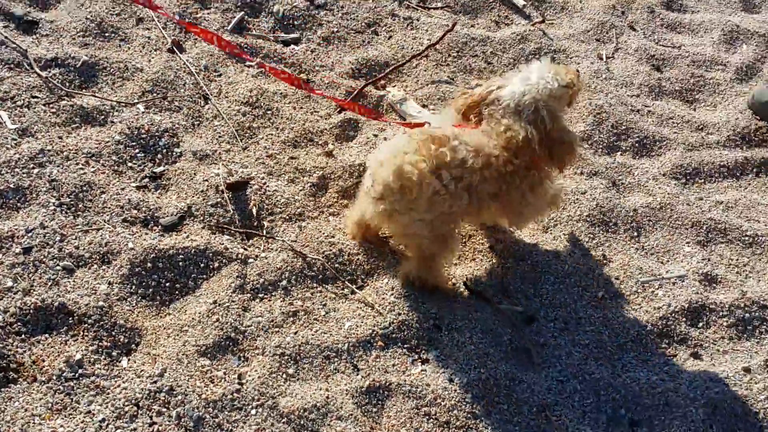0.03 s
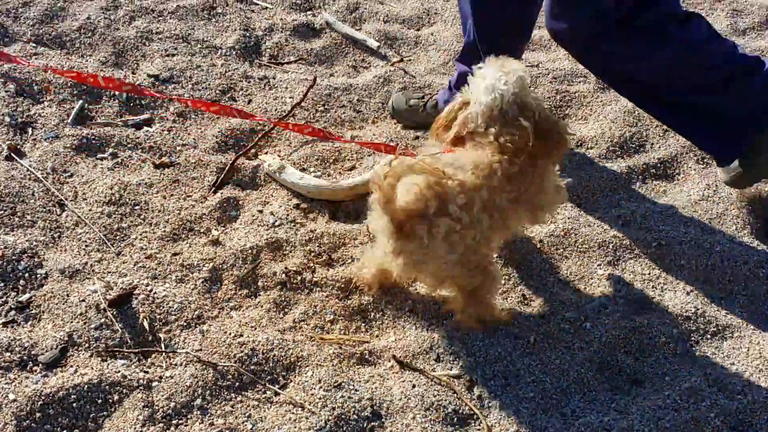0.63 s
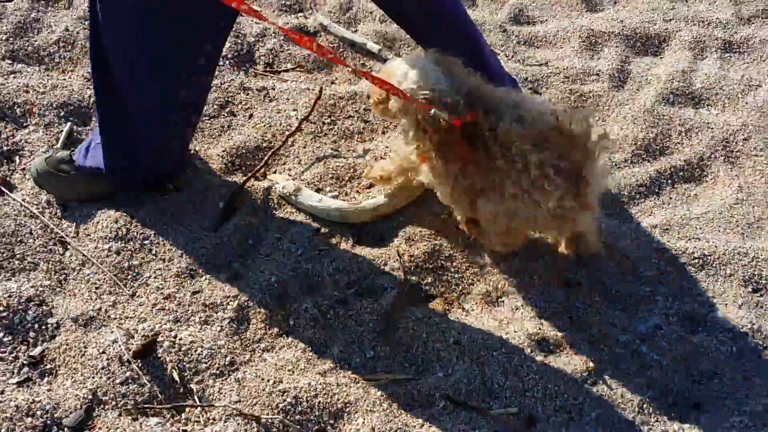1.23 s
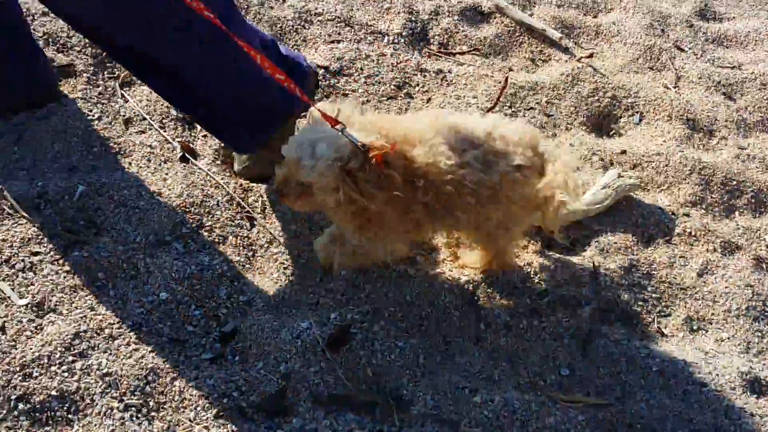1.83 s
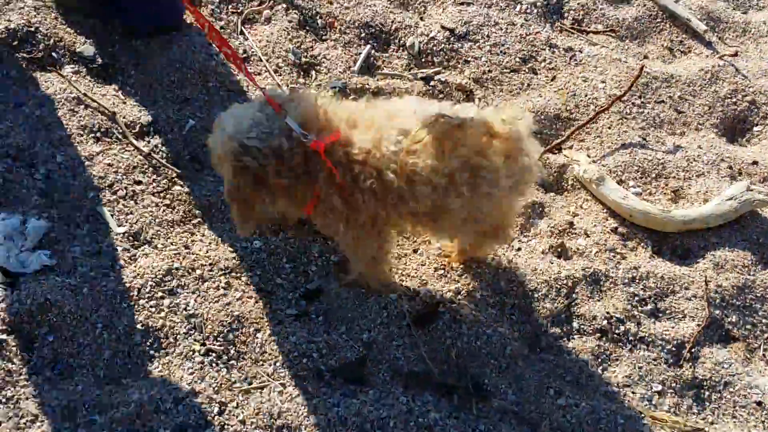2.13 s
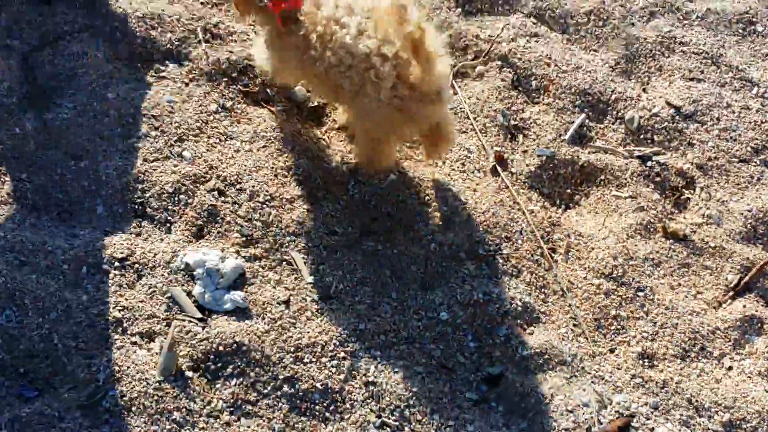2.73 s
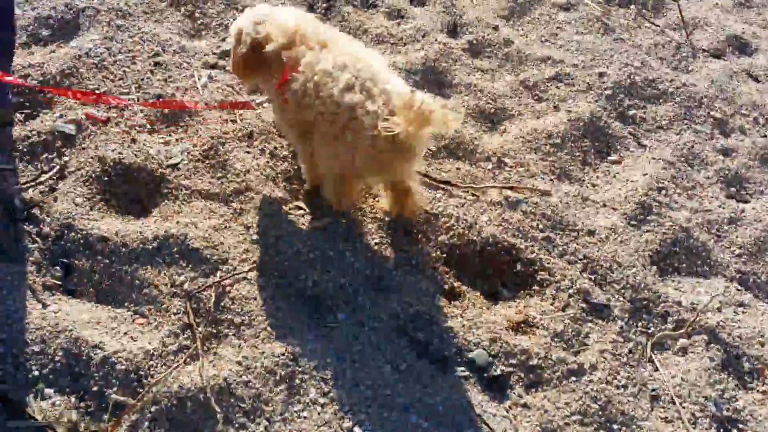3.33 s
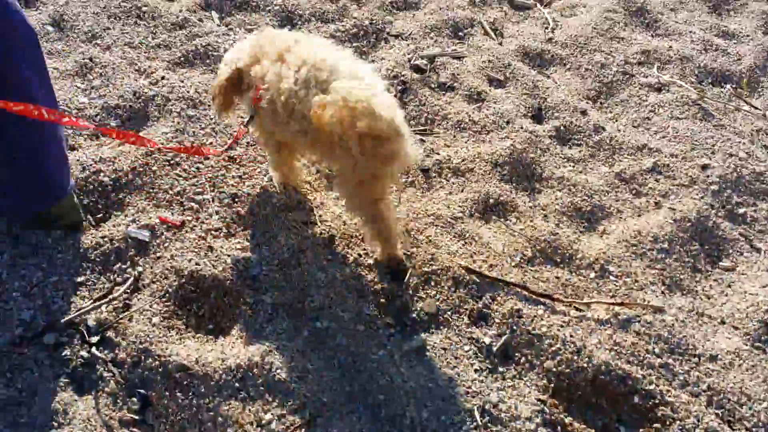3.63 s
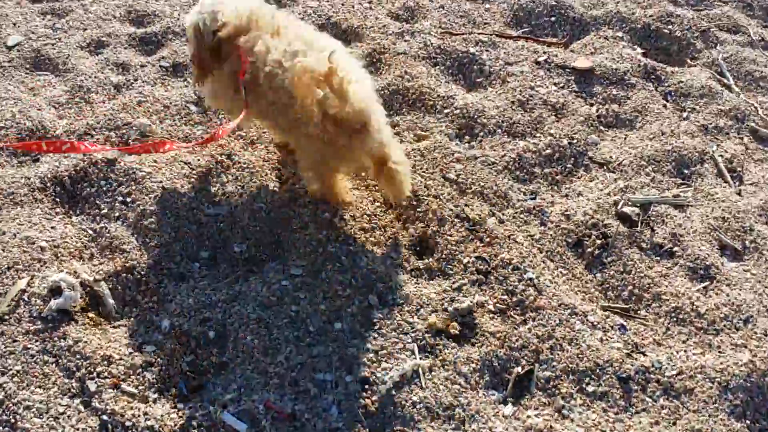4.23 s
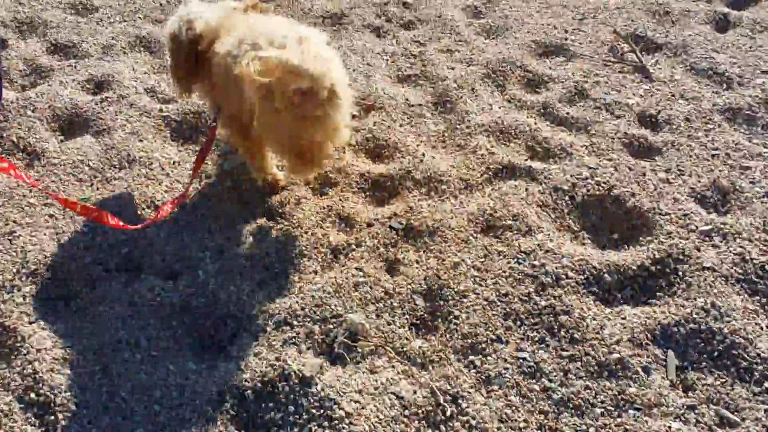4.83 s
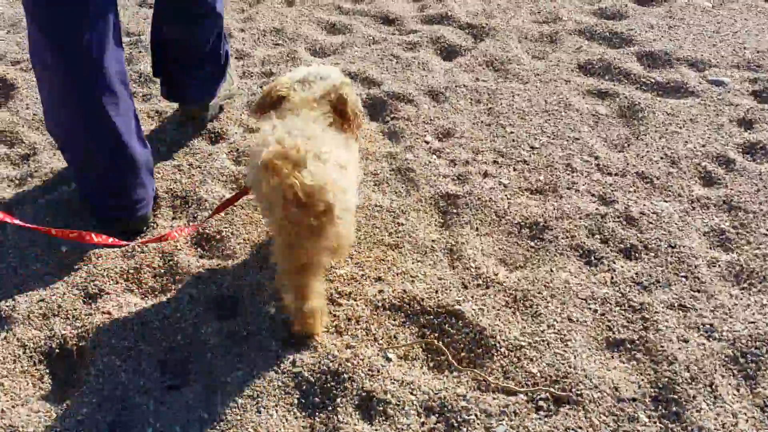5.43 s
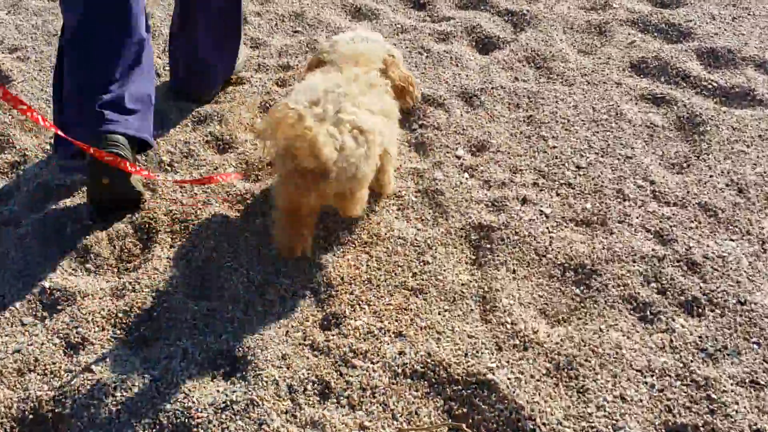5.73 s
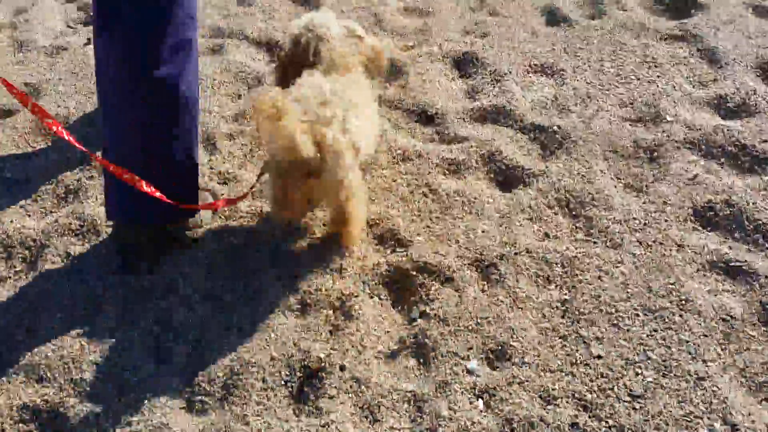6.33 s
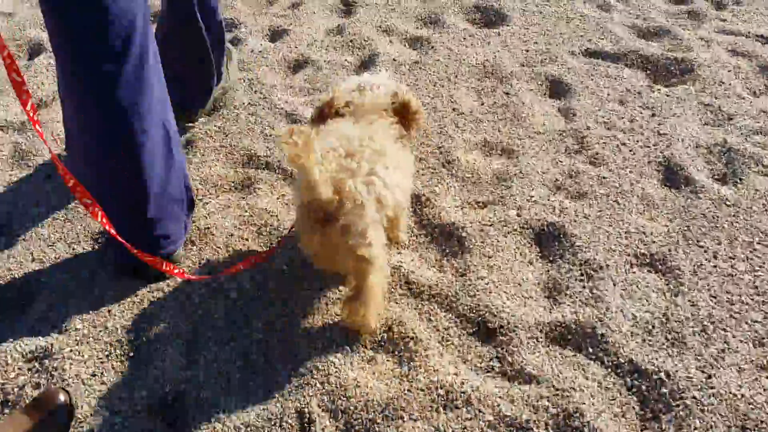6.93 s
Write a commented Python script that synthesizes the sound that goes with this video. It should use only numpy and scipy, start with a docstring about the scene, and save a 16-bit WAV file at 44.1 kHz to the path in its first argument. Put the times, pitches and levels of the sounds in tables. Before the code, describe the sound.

Wind rumbles and buffets the microphone as a person and a small dog walk over gritty beach sand.

```python
"""On a beach of coarse sand, a walker leads a small dog just ahead of a hand-held camera.
Shoes and paws set off countless grain collisions, heard as a low crunch and a bright spray. Soles rasp
by friction, a twig fractures, and the metal clasp of the leash rings in short-lived modes.
Turbulent wind buffets mainly the left microphone port; faint surf lies behind."""
import sys
import numpy as np
from scipy import signal
from scipy.fft import rfft, irfft, next_fast_len
from scipy.io import wavfile
from scipy.ndimage import uniform_filter1d, map_coordinates

SR = 44100
rng = np.random.default_rng(int(sys.argv[2]) if len(sys.argv) > 2 else 0)


def generate_wav(signal):
    """Clip the signal to [-1, 1] and save it as 16-bit WAV at the path in sys.argv[1]."""
    frames = np.transpose(np.atleast_2d(signal))
    scaled = np.clip(frames, -1, 1) * 32767
    pcm = np.round(scaled).astype(np.int16)
    wavfile.write(sys.argv[1], SR, pcm)


N = 317520

# Event levels are relative: each source adds its own gain.
# resonances and notches of the two port ducts: frequency_hz, left_db, right_db
PORT_RESPONSE = [(400, -6, -3.5), (1110, -9, -3.5), (1645, -7, -0.5), (2210, -6.5, -9.5),
                 (2970, -17.5, -17), (3660, -11.5, -7), (5170, -12.5, -5.5), (5860, -14, -10),
                 (6920, -1.5, -10.5), (8030, -7.5, -2), (8500, -8, 3), (9520, -11.5, -9.5),
                 (10600, -11, -9), (15500, -13, -11.5)]
# spectra of water and moving air: frequency_hz, gain_db
SURF_SPECTRUM = [(20, 3), (90, -3.5), (250, 0.5), (600, -3), (1500, -10.5), (3000, -13.5), (14000, -20.5)]
BREEZE_SPECTRUM = [(15, -20), (35, -9), (70, 5), (130, 6), (220, -6), (350, -15.5), (600, -45), (1500, -57),
                   (4000, -90)]
EDDY_SPECTRUM = [(15, -29), (40, -21), (70, 0), (135, 3), (250, -4), (370, -17), (600, -36), (1500, -67),
                 (4000, -92)]
FLUTTER_SPECTRUM = [(150, -26), (350, 4.5), (480, -4.5), (700, -12.5), (1100, -28.5), (2000, -66),
                    (5000, -72)]
POP_SPECTRUM = [(100, -19), (330, 3.5), (480, -1), (750, 7.5), (1150, 8.5), (1700, -6), (4000, -35)]
# strength of the wind at the camera: time_s, level_db
BREEZE_LEVELS = [(0.0, -34), (0.36, -35), (0.68, -38), (0.94, -50), (1.14, -27.5), (1.46, -41),
                 (1.86, -45.5), (2.15, -51), (2.3, -35.5), (2.63, -38), (2.87, -38.5), (3.11, -50),
                 (3.23, -28), (3.31, -27), (3.57, -32), (4.43, -32), (4.61, -28), (4.87, -35.5),
                 (5.21, -41.5), (5.37, -46.5), (6.44, -42), (6.66, -31), (6.94, -31.5), (7.2, -35)]
# eddies that buffet a port: start_s, length_s, level_db, flutter_offset_db, port
EDDIES = [(0.0, 0.097, -21.5, -36, "left"), (0.104, 0.053, -14.5, -16.5, "left"),
          (0.113, 0.12, -37, -24, "right"), (0.178, 0.038, -12.5, -21, "left"),
          (0.315, 0.09, -17, -18.5, "left"), (0.442, 0.14, -27.5, -24, "left"),
          (0.915, .039, -19.5, -19, "left"), (0.967, 0.085, -27, -53, "left"),
          (1.183, .048, -15.5, -22, "left"), (1.256, 0.046, -25.5, -22, "left"),
          (1.361, 0.031, -25, -32, "left"), (1.777, 0.028, -25.5, -19, "left"),
          (1.907, 0.052, -22, -19, "left"), (2.082, 0.074, -15, -15, "left"),
          (2.167, 0.082, -22, -35, "left"), (2.304, 0.14, -19, -14, "left"),
          (2.455, 0.045, -10.5, -14, "left"), (2.556, 0.11, -29.5, -39, "left"),
          (3.048, 0.077, -22.5, -19, "left"), (3.137, 0.038, -13.5, -28, "left"),
          (3.187, 0.056, -16.5, -19, "left"), (3.262, 0.13, -12.5, -20, "left"),
          (3.47, 0.05, -15, -14, "left"), (3.586, 0.069, -22, -17, "left"),
          (3.771, 0.08, -30, -30, "right"), (3.832, 0.091, -18, -23, "left"),
          (4.013, 0.023, -19, -34, "left"), (4.072, 0.059, -13.5, -21, "left"),
          (4.132, 0.025, -28, -14, "right"), (4.142, .043, -23, -20, "left"),
          (4.28, 0.051, -19, -25, "left"), (4.376, 0.022, -19, -31, "left"),
          (4.461, 0.039, -13.5, -12.5, "left"), (4.595, 0.041, -11, -16, "left"),
          (4.643, 0.045, -13.5, -16.5, "left"), (4.7, 0.059, -15.5, -29, "left"),
          (4.785, 0.041, -20.5, -34, "left"), (5.147, 0.077, -18.5, -22, "left"),
          (5.23, 0.05, -12.5, -16.5, "left"), (5.591, 0.041, -21.5, -12, "left"),
          (5.687, 0.053, -22, -26, "left"), (5.751, 0.12, -27, -39, "left"),
          (5.78, 0.042, -34, -25, "right"), (6.099, 0.039, -20, -18, "left"),
          (6.436, 0.065, -16.5, -15.5, "left"), (6.594, 0.049, -12.5, -21, "left"),
          (6.695, 0.063, -29.5, -25, "right"), (6.759, 0.087, -10.5, -10, "left"),
          (6.856, 0.079, -17, -11.5, "left"), (6.953, 0.023, -23.5, -25, "right"),
          (7.078, 0.037, -17.5, -12, "left"), (7.157, .024, -12.5, -14.5, "left")]
# the fiercest eddies bursting on the left port: start_s, level_db
POPS = [(0.119, -18), (2.084, -18), (2.102, -21), (2.465, -24), (3.164, -15.5), (3.215, -23), (3.266, -27),
        (3.495, -16), (4.477, -16), (4.485, -21.5), (4.618, -15), (5.244, -21.5), (6.624, -17.5),
        (6.794, -11.5), (6.827, -24), (7.168, -23)]
# modes of the leash clasp: pitch_hz, level_db
CLASP_MODES = [(4050, -7), (5050, -13), (6900, -1), (7650, 0), (10600, -3), (13300, -3)]
# clasp and ring touch: start_s, level_db
CLINKS = [(2.642, -23.5), (2.651, -32), (2.659, -25.5), (2.666, -32), (2.673, -25), (2.726, -26),
          (2.768, -32)]
# two quick cracks of the twig: start_s, level_db
SNAPS = [(3.9199, -12), (3.922, -19.5)]
# spectra of breaking wood and moving sand: frequency_hz, gain_db
TWIG_SPECTRUM = [(300, -20), (650, -13), (850, 6), (1150, -2), (1600, -6), (2900, 6.5), (4250, 3),
                 (5500, -1), (7200, 0), (9500, -14), (14000, -4)]
BRUSH_SPECTRUM = [(3000, -42), (6800, -3), (7800, -6), (8300, 4), (9000, -3), (10500, -5), (14500, -3)]
SCUFF_SPECTRUM = [(500, -11), (1150, -12), (1450, 3.5), (1550, -6), (1660, 4), (1950, -7), (3000, -11),
                  (5000, -14), (14000, -18)]
TRICKLE_SPECTRUM = [(3000, -21), (7000, -20), (10000, 1), (14500, -9)]
SPRAY_SPECTRUM = [(500, -15), (1800, -3), (3500, -1), (8000, 0.5), (14500, 0.5)]
CRUNCH_SPECTRUM = [(100, 3), (400, -0.5), (900, 3.5), (2200, 2.5), (3200, -0.5), (5000, -2), (10000, -50)]
# paws brush the fine top layer: start_s, length_s, level_db
PAW_BRUSHES = [(0.06, 0.11, -46.5), (0.68, 0.13, -47), (1.36, 0.071, -50), (2.0, 0.24, -46.5),
               (2.2, 0.081, -40), (2.7, 0.059, -46), (2.99, .11, -41), (3.21, 0.036, -47),
               (4.28, 0.083, -49), (6.34, 0.24, -45), (6.93, 0.052, -38)]
# soles grind the packed sand: start_s, length_s, level_db
SOLE_SCUFFS = [(1.87, 0.043, -39), (3.205, 0.027, -49), (4.922, 0.025, -38), (5.74, 0.043, -28.5),
               (5.757, 0.012, -29), (6.39, 0.056, -38.5), (6.95, 0.079, -40)]
# feet strike and throw grains: start_s, level_db, t60_s
KICKS = [(0.051, -39.5, 0.11), (1.141, -38, .12), (1.335, -39.5, 0.087), (1.709, -36.5, 0.41),
         (2.881, -34.5, 0.051), (2.963, -30.5, 0.031), (3.596, -32, 0.092), (4.186, -33, 0.073),
         (4.906, -33, 0.13), (5.175, -26, 0.051), (5.393, -37, .012), (6.007, -34, 0.026),
         (6.156, -34, .12), (6.976, -23.5, 0.045), (6.983, -21.5, 0.037)]
# shoes and paws sink in: start_s, rise_s, hold_s, spray_db, crunch_db, spray_left_minus_right_db
STEPS = [(0.0, 0.088, 0.098, -52, -51, 4), (0.308, 0.19, .07, -45, -43, -6),
         (0.564, .1, .19, -42.5, -45.5, -2.5), (1.03, .07, .02, -50, -57, -1),
         (1.125, 0.049, 0.021, -35, -37, 0), (1.324, 0.058, .1, -43.5, -45, 0),
         (1.5, 0.14, .03, -48, -50, -1), (1.683, 0.051, 0.052, -33.5, -39, 0),
         (1.841, 0.04, 0.041, -37.5, -41.5, 0), (1.96, 0.016, 0.079, -40.5, -59, -2),
         (2.153, 0.093, 0.062, -40, -47, -4), (2.307, 0.047, 0.064, -37, -43, -1),
         (2.515, .05, 0.27, -45.5, -49.5, -1), (2.864, 0.16, 0.07, -38.5, -44.5, -0.5),
         (3.174, 0.042, .015, -37.5, -40.5, -3), (3.28, 0.089, 0.039, -40.5, -48.5, -3),
         (3.46, 0.14, 0.12, -36.5, -44, -2), (3.771, 0.051, 0.023, -36.5, -41.5, -1.5),
         (3.863, 0.032, 0.15, -33.5, -43, -1.5), (4.172, 0.11, 0.08, -32, -38.5, 0),
         (4.376, 0.07, 0.014, -33.5, -42.5, -1.5), (4.519, 0.029, 0.035, -34, -38.5, -5),
         (4.63, 0.036, 0.024, -33, -41, -3), (4.74, .03, 0.17, -38, -43.5, 1),
         (4.878, 0.055, 0.022, -27.5, -35.5, 0), (4.968, 0.034, 0.058, -38, -42.5, -2),
         (5.056, 0.14, 0.085, -31.5, -36, -4), (5.473, 0.12, 0.022, -28.5, -35, 1),
         (5.638, 0.051, .02, -35.5, -43, -2), (5.722, 0.038, 0.14, -31.5, -40.5, -4),
         (5.972, 0.072, 0.15, -44, -46.5, -2), (6.104, 0.12, 0.058, -31.5, -36, -0.5),
         (6.268, .11, 0.038, -29.5, -34.5, -4.5), (6.474, .03, .025, -36, -37, -5),
         (6.554, .04, 0.22, -44, -42.5, 0), (6.799, 0.092, 0.098, -31, -34.5, 0.5),
         (6.98, 0.021, 0.052, -45, -38.5, -20)]


def amp(db):
    """Amplitude ratio of a level in decibels."""
    return 10 ** (np.asarray(db) / 20)


def unit(x):
    """Normalisation to rms 1."""
    return x / np.sqrt(np.mean(x ** 2) + 1e-20)


def wobble(knots_per_s):
    """Smooth random modulation: a spline through Gaussian knots."""
    knots = rng.standard_normal(int(N * knots_per_s / SR) + 4)
    return map_coordinates(knots, [np.arange(N) * knots_per_s / SR])


def gain(spectrum, hz):
    """Magnitude response, interpolated in log frequency for each level column."""
    points_hz, *columns = np.transpose(spectrum)
    return amp(np.squeeze([np.interp(np.log(hz + 1), np.log(points_hz), db) for db in columns]))


def filtered(x, response):
    """Linear filtering: multiplication in the frequency domain."""
    size = next_fast_len(N + 8192, real=True)
    hz = np.fft.rfftfreq(size, 1 / SR)
    return irfft(rfft(x, size) * response(hz), size)[..., :N]


def coloured(x, spectrum):
    """Zero-phase spectral shaping."""
    return filtered(x, lambda hz: gain(spectrum, hz))


def at_ports(pair, spectrum, correlation, lag_s=0):
    """Two independent signals mix and pass the duct resonances; the left leads by lag_s."""
    angle = np.arccos(correlation) / 2
    mixed = np.cos(angle) * pair[0] + np.sin(angle) * np.array([pair[1], -pair[1]])
    lead_s = np.array([[lag_s], [-lag_s]]) / 2

    def response(hz):
        return gain(spectrum, hz) * gain(PORT_RESPONSE, hz) * np.exp(2j * np.pi * hz * lead_s)
    return filtered(mixed, response)


def add_gated(track, source, start_s, length_s, db, edge_s):
    """Windowing: add a soft-edged burst with the energy of rms level db held for length_s."""
    end_s = start_s + length_s
    i = np.arange(max(int((start_s - edge_s) * SR), 0), min(int((end_s + edge_s) * SR), N))
    inside_s = np.minimum(i / SR - start_s, end_s - i / SR)
    gate = .5 + .5 * np.sin(np.pi / 2 * np.clip(inside_s / edge_s, -1, 1))
    burst = gate * source[i]
    track[i] += amp(db) * burst * np.sqrt(length_s * SR / (np.sum(burst ** 2) + 1e-12))


def impacts(rows):
    """Impulsive excitation: stereo noise starts at once and decays exponentially."""
    t = np.arange(SR // 4) / SR
    out = np.zeros((2, N + SR))
    for start_s, db, t60_s in rows:
        decay = amp(db - 60 * t / t60_s)
        out[:, round(start_s * SR):][:, :len(t)] += decay * rng.standard_normal((2, len(t)))
    return out[:, :N]


def surf(level_db=-44.5, heave_db=-0.3):
    """Distant waves sum incoherently to a dull wash that heaves slightly."""
    wash = unit(at_ports(rng.standard_normal((2, N)), SURF_SPECTRUM, correlation=0.62))
    return wash * amp(level_db + heave_db * wobble(0.85))


def turbulence(spectrum, span_s):
    """Random pressure of turbulent air, held near rms 1 over each span."""
    pressure = coloured(rng.standard_normal(N), spectrum)
    power = np.abs(uniform_filter1d(pressure ** 2, int(span_s * SR)))
    return pressure / np.sqrt(power + 1e-12)


def wind(exposed_db=4, sheltered_db=-39.5, sheltered_share=0.19):
    """Turbulent flow rumbles over both ports; eddies thump, and flow separation flutters higher up."""
    breeze_db = np.interp(np.arange(N) / SR, *np.transpose(BREEZE_LEVELS))
    right_db = sheltered_db + sheltered_share * (breeze_db - breeze_db.mean())
    left = turbulence(BREEZE_SPECTRUM, span_s=0.06) * amp(breeze_db + exposed_db + 2.7 * wobble(35))
    right = turbulence(BREEZE_SPECTRUM, span_s=0.24) * amp(right_db + 4.6 * wobble(25))
    thump = turbulence(EDDY_SPECTRUM, span_s=0.0292)
    flutter = turbulence(FLUTTER_SPECTRUM, span_s=0.014) * amp(4.3 * wobble(170))
    for start_s, length_s, db, flutter_db, port in EDDIES:
        track = left if port == "left" else right
        add_gated(track, thump, start_s, length_s, db - .3, edge_s=0.0077)
        add_gated(track, flutter, start_s, length_s, db + flutter_db, edge_s=0.0061)
    # the ports pass little of the deepest rumble
    return coloured(np.array([left, right]), [(20, -8), (45, 0.5), (90, -0.5)])


def eddy_pops(ring_hz=350, rise_s=0.0013, gain_db=9):
    """A collapsing eddy is a pressure transient: one or two sharp swings at the left port."""
    t = np.arange(SR // 40) / SR
    swell = t / rise_s * np.exp(1 - t / rise_s)
    left = np.zeros(N + SR)
    for (start_s, db), detune in zip(POPS, rng.standard_normal(len(POPS))):
        swing = np.sin(2 * np.pi * ring_hz * (1 + 0.079 * detune) * t)
        left[round(start_s * SR):][:len(t)] += amp(db + gain_db) * swell * swing
    return np.array([coloured(left[:N], POP_SPECTRUM), np.zeros(N)])


def leash(t60_s=0.022, pitch_spread=0.052, spread_db=2, rattle_db=-4, gain_db=-6.5):
    """Modal ringing: each touch excites the clasp a little differently, and loose parts rattle."""
    t = np.arange(SR // 10) / SR
    mode_hz, mode_db = np.transpose(CLASP_MODES)[:, :, None]
    out = np.zeros((2, N))
    for start_s, db in CLINKS:
        detune, strength = rng.standard_normal((2, len(mode_hz), 1))
        phase = rng.random((2, len(mode_hz), 1))
        modes = np.sin(2 * np.pi * (mode_hz * (1 + pitch_spread * detune) * t + phase))
        ring = np.sum(amp(mode_db + spread_db * strength) * modes, axis=1)
        ring += amp(rattle_db) * rng.standard_normal((2, len(t)))
        out[:, round(start_s * SR):][:, :len(t)] += amp(db + gain_db - 60 * t / t60_s) * ring
    return out


def twig(t60_s=0.017, gain_db=9):
    """Brittle fracture: dry wood cracks and is damped at once by the sand."""
    cracks = impacts([(start_s, db, t60_s) for start_s, db in SNAPS])
    return amp(gain_db) * at_ports(cracks, TWIG_SPECTRUM, correlation=0.4)


def grains(per_s, spread_db):
    """Shot noise of grain collisions: two uncorrelated trains that share their instants."""
    hits = np.flatnonzero(rng.random(N) < per_s / SR)
    draws = rng.standard_normal((len(hits), 3)).T
    sizes = amp(spread_db * np.minimum(draws[0], 2))
    trains = np.zeros((2, N))
    trains[:, hits] = sizes * draws[1:]
    return unit(trains)


def patchy(x, depth_db):
    """Spectral modulation: each clump has its own grain sizes, so the colour keeps shifting."""
    spectra = signal.stft(x, nperseg=256)[2]
    field = rng.standard_normal(spectra.shape[1:])
    field = uniform_filter1d(field, size=5, axis=0)  # smooth over frequency
    field = uniform_filter1d(field, size=9, axis=1)  # and over time
    return signal.istft(spectra * amp(depth_db * unit(field)), nperseg=256)[1][:, :N]


def slides(rows, spectrum, correlation, right_bias_db):
    """Sliding friction: a foot rubs the grains into a brief rasp."""
    rasp = at_ports(grains(per_s=5000, spread_db=-1.5), spectrum, correlation, lag_s=.0001)
    left, right = np.zeros((2, N))
    for start_s, length_s, db in rows:
        add_gated(left, rasp[0], start_s, length_s, db - right_bias_db / 2, edge_s=length_s / 5)
        add_gated(right, rasp[1], start_s, length_s, db + right_bias_db / 2, edge_s=length_s / 5)
    return np.array([left, right])


def kicks(gain_db=9.5):
    """Momentum transfer: a striking foot throws a sudden shower of grains."""
    return amp(gain_db) * at_ports(impacts(KICKS), SPRAY_SPECTRUM, correlation=0.39, lag_s=.0001)


def tread(age_s, rise_s, hold_s, sag_db_per_s=7.5, release_db_per_s=157, settle_db_per_s=8.5):
    """Loading and relaxation set the gain of a step: the weight comes on, rests and lifts."""
    press = np.sin(np.pi / 2 * np.clip(age_s / rise_s, 0, 1)) ** 2
    resting_s = np.clip(age_s - rise_s, 0, hold_s)
    lifted_s = np.maximum(age_s - rise_s - hold_s, 0)
    release = amp(-release_db_per_s * lifted_s)
    settle = amp(-17 - settle_db_per_s * lifted_s)  # the rim of the print keeps caving in
    return press * amp(-sag_db_per_s * resting_s) * np.maximum(release, settle)


def step_levels(floor_db=-57):
    """Incoherent steps add in power, giving the levels in dB of spray (left, right) and crunch."""
    t = np.arange(N) / SR
    power = np.full((3, N), amp(floor_db) ** 2)
    for start_s, rise_s, hold_s, spray_db, crunch_db, pan_db in STEPS:
        sizes = amp([[spray_db + pan_db / 2], [spray_db - pan_db / 2], [crunch_db]])
        i = round(start_s * SR)
        power[:, i:] += (sizes * tread(t[i:] - start_s, rise_s, hold_s)) ** 2
    level_db = 10 * np.log10(power)
    return level_db[:2], level_db[2]


def footsteps():
    """Granular collisions: grains under load crunch low in pitch, while thrown grains spray and hiss."""
    spray_db, crunch_db = step_levels()
    pressed = patchy(grains(per_s=5000, spread_db=2.5), depth_db=2.5)
    crunch = unit(at_ports(pressed, CRUNCH_SPECTRUM, correlation=0.42, lag_s=0.00036))
    crunch *= amp(crunch_db + 3)
    thrown = patchy(grains(per_s=14000, spread_db=0.5), depth_db=2)
    spray = at_ports(thrown, SPRAY_SPECTRUM, correlation=0.37, lag_s=0.000515)
    spray *= amp(spray_db - 0.1) / np.std(spray, axis=1, keepdims=True)
    # loose grains trickle back into the prints, ticking brightly even between steps
    loose = grains(per_s=2200, spread_db=-0.5)
    trickle = unit(at_ports(loose, TRICKLE_SPECTRUM, correlation=0.093))
    trickle *= amp(0.57 * spray_db.mean(axis=0) - 24)
    return crunch + spray + trickle


def scene():
    """Superposition of surf, wind and the walk at the two ports."""
    background = surf() + wind() + eddy_pops()
    paws = slides(PAW_BRUSHES, BRUSH_SPECTRUM, correlation=0.15, right_bias_db=5)
    soles = slides(SOLE_SCUFFS, SCUFF_SPECTRUM, correlation=0.75, right_bias_db=4)
    return background + leash() + twig() + paws + soles + kicks() + footsteps()


def record(dry, ceiling=.95, top_hz=14680):
    """Soft saturation in the camera rounds the largest peaks; its band limit removes the top treble."""
    rounded = dry / (1 + np.abs(dry / ceiling) ** 6) ** (1 / 6)
    return filtered(rounded, lambda hz: hz < top_hz)


dry = scene()
out = record(dry)
generate_wav(out)
```